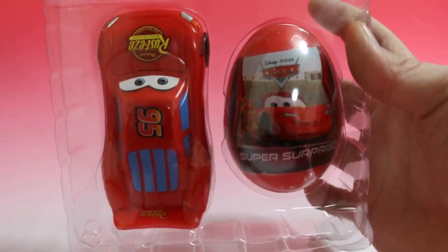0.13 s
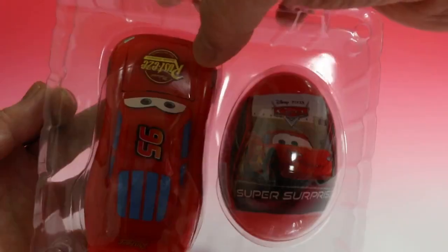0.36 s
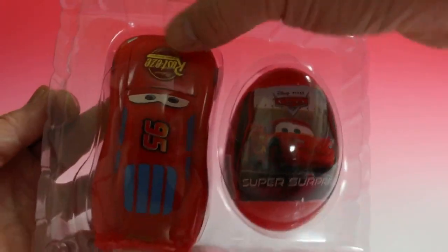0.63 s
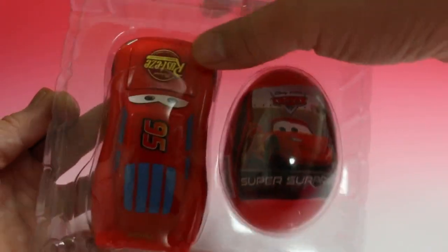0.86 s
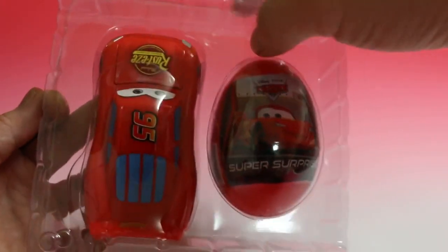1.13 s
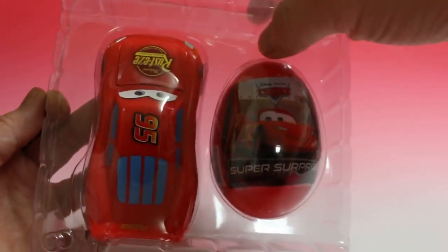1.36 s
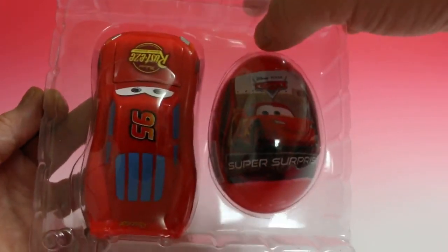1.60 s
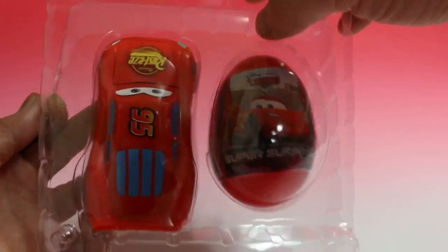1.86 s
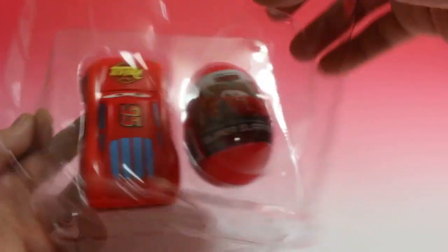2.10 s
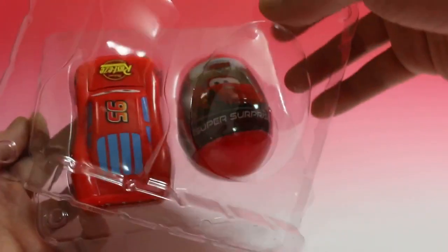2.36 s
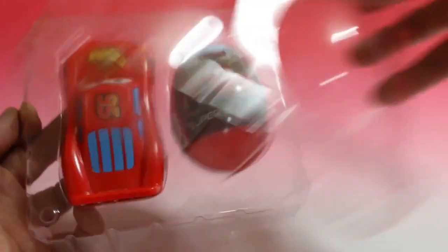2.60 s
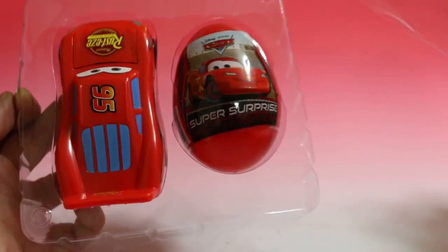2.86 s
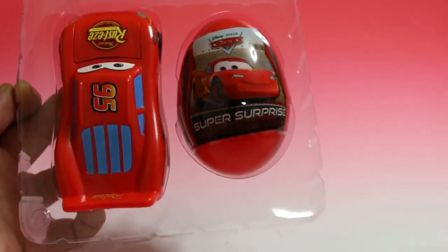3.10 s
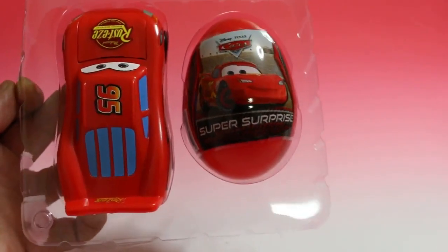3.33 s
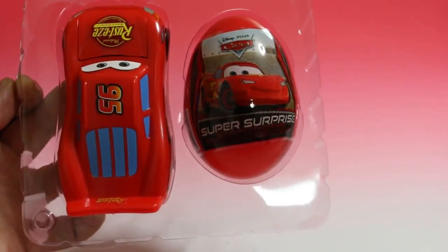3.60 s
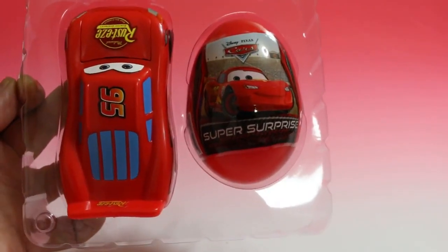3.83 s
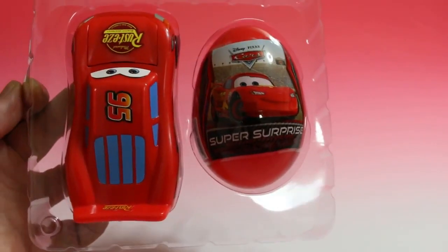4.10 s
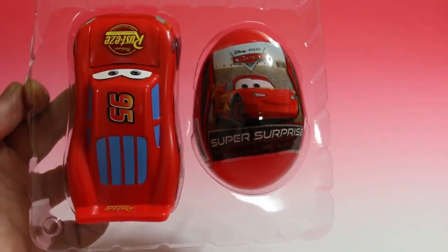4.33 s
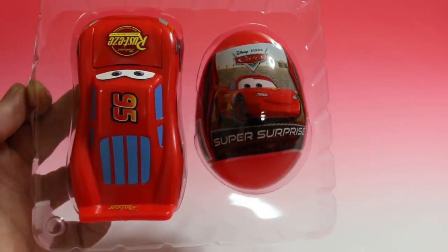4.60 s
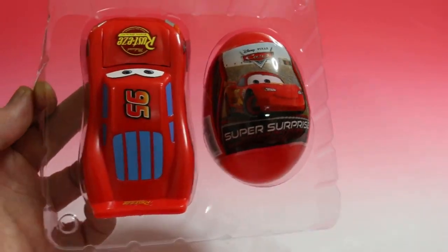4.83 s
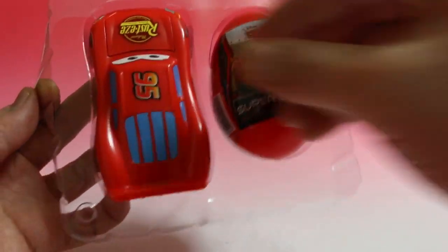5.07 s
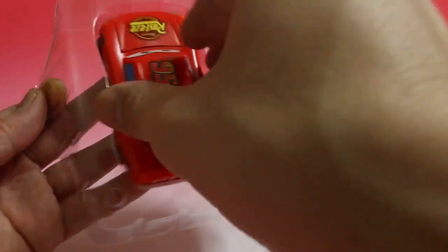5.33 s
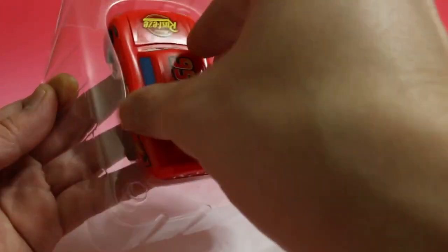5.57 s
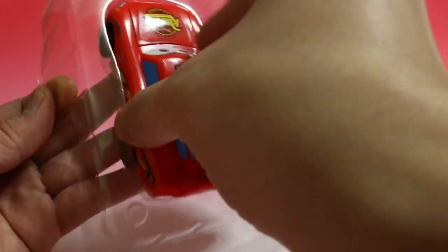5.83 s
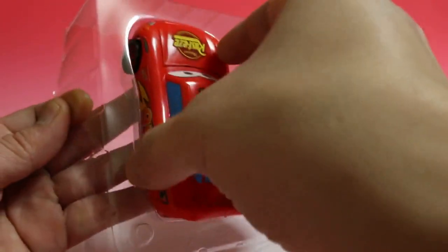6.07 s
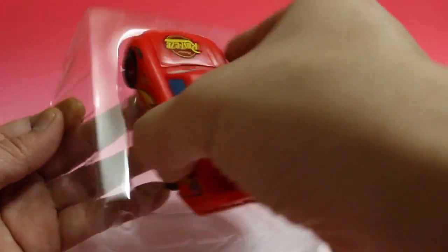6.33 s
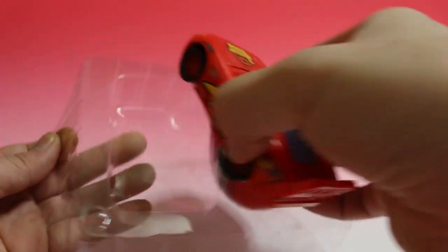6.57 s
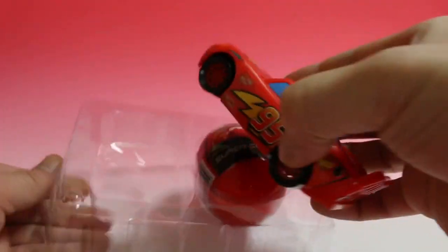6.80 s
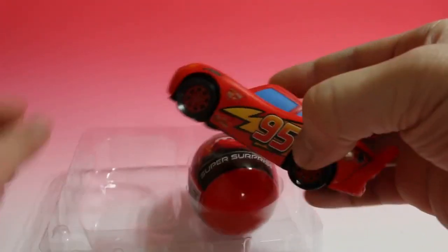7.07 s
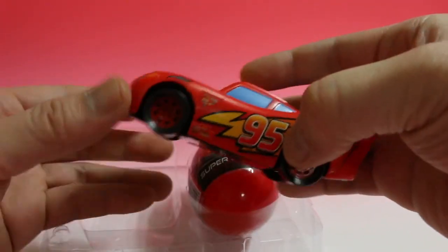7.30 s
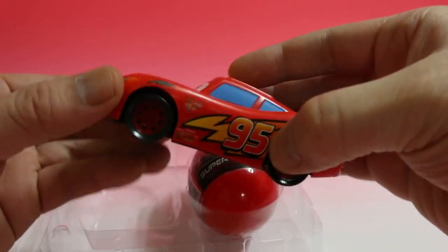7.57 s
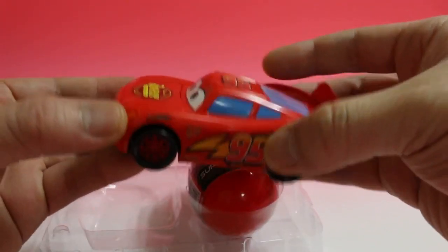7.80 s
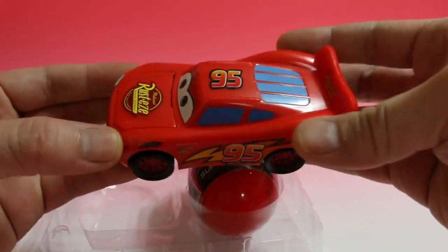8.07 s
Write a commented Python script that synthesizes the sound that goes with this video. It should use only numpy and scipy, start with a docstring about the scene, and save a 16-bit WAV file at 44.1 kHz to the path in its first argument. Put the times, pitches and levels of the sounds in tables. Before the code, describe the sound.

Close stereo pickup in a small, hard-sounding space, with low room hum and faint hiss throughout. Almost nothing until 0.4 s, when faint plastic ticks begin; from 0.7 to 1.0 s soft hollow pops and crinkles of a stiff clear tray. A quiet gap, then pops at 1.8 s and a crisp, bright snap with rustle at about 2.2 s. Tiny ticks fade by 3.2 s, leaving nearly a second of only room tone. From 4.1 to 4.8 s light dry crackling returns. After 5 s the tray flexes harder: dull pops, a strong crack at 5.5 and a very sharp one at 5.85 s. A short lull with soft bumps follows, then 6.35 to 7.2 s is densest: loud snaps, scraping rustle, boxy ringing plastic and low knocks, heaviest around 6.7 to 7.0 s. It thins to small clicks and faint crinkles until 8.2 s.

```python
"""Hands open a stiff, clear plastic blister tray close by and lift a toy out of it.
Buckling panels snap as short filtered noise bursts; rubs and bends rustle as streams of tiny noise puffs.
The bent tray hums a few notes, and knocks add dull thuds and a low shake of the table.
A small hard space answers with a short tail that rings on a few notes.
Room hum and microphone hiss, made of filtered noise, lie under it all."""
import sys
import numpy as np
from scipy import signal
from scipy.fft import rfft, irfft, next_fast_len
from scipy.io import wavfile
from scipy.ndimage import map_coordinates

SR = 44100
rng = np.random.default_rng(int(sys.argv[2]) if len(sys.argv) > 2 else 0)


def pcm_store(signal):
    """Save signal as 16-bit PCM."""
    levels = np.round(np.clip(np.atleast_2d(signal), -1, 1) * 32767)
    wavfile.write(sys.argv[1], SR, levels.astype(np.int16).T)


def voltage_ratio(level):
    """Linear amplitude factor for a level in decibels (scalar or array-like)."""
    return 10 ** (np.asarray(level, float) / 20)


N = 360738  # length in samples


# Buckling panels, peak levels before the top sheen is added:
# [start_s, crack_level_db, crack_pitch_hz, body_level_db, tick_level_db]
BUCKLES = [(.383, -52, 1500, -49, -63), (.401, -42.5, 1750, -43, -60), (0.477, -45, 1750, -44.5, -63),
           (0.6582, -47, 2350, -44, -50), (.675, -34, 2440, -44, -32.5), (0.7249, -28, 1650, -18, -57),
           (0.755, -28.5, 1630, -27, -58), (0.844, -27.5, 1550, -29, -55), (.8996, -27, 2240, -45, -51),
           (0.9867, -37, 3500, -38, -31.5), (1.142, -40, 1950, -43, -50), (1.363, -44, 1900, -50, -64),
           (1.729, -46, 2200, -48, -63), (1.7918, -34, 1600, -27, -61), (1.8279, -26, 1690, -29, -40),
           (1.9285, -45, 1520, -28.5, -62), (2.0495, -48, 1500, -57, -62), (2.172, -30, 1960, -48, -43),
           (2.184, -16, 2430, -27, -12), (2.2017, -35, 1670, -26, -32), (2.364, -31, 1900, -46, -40),
           (2.4745, -42, 2030, -50, -47), (2.594, -41, 2010, -55, -42), (2.6657, -46, 2060, -47, -33),
           (2.862, -38.5, 2880, -52, -55), (2.9818, -38.5, 2410, -57, -50), (3.02, -38, 2100, -44, -40),
           (3.1358, -37, 1940, -50, -43), (4.0641, -37.5, 1800, -42, -61), (4.1026, -30, 2900, -52, -56),
           (4.148, -42, 1520, -43, -67), (4.2538, -27.5, 2020, -44, -62), (4.3983, -23, 3300, -36, -42),
           (4.498, -27.5, 1970, -36, -43), (4.5471, -29, 1510, -37, -62), (4.642, -40, 1500, -38, -57),
           (4.6844, -26.5, 1480, -30.5, -55), (4.7386, -35, 1730, -36.5, -50),
           (5.0408, -26.5, 2100, -23, -65), (5.0665, -42, 1550, -19, -62), (5.1767, -35, 1580, -37, -50),
           (5.1907, -30.5, 1580, -30, -40.5), (5.2614, -37, 1500, -29, -42),
           (5.3941, -41.5, 2150, -40, -56), (5.419, -45, 2200, -48, -47), (5.45, -15, 2400, -18, -58),
           (5.514, -35, 2050, -23, -45), (5.539, -2.5, 2610, -12, -17), (5.6444, -32, 2950, -41, -58),
           (5.8502, 0.5, 2920, -9, -0.5), (5.8567, -7.5, 3230, -16.5, -16), (5.901, -10, 2250, -25, -17.5),
           (5.9317, -17.5, 2160, -23, -39), (5.996, -38, 2400, -24.5, -54), (6.0689, -34.5, 1950, -38, -65),
           (6.1693, -41.5, 1860, -35, -58), (6.2659, -36, 2050, -28.5, -52),
           (6.346, -14.5, 2400, -29, -14.5), (6.3706, -18.5, 2000, -42, -35),
           (6.3977, -29, 1980, -23.5, -25.5), (6.442, -24, 1890, -18, -23.5),
           (6.4496, -2.5, 1800, -20.5, -19), (6.5337, -39, 2160, -20.5, -52), (6.5425, -40, 1740, -26, -45),
           (6.6269, -11, 2160, -18, -36), (6.6767, -21, 1700, -19, -42), (6.704, -0.5, 2750, -9, -9.5),
           (6.8531, -16.5, 1810, -14.5, -26), (6.9005, -25.5, 1500, -27, -30),
           (6.9346, -18, 1760, -29, -24.5), (6.9781, 0, 1600, -7.5, -2.5), (7.0883, -19.5, 1830, -20, -39),
           (7.1294, -19, 1590, -14.5, -31), (7.2956, -33, 1730, -30, -55), (7.3497, -40, 2090, -33, -58),
           (7.4365, -28.5, 1680, -28, -60), (7.5564, -39, 1650, -37, -65), (7.5966, -42, 2880, -51, -52),
           (7.674, -16, 2640, -33, -24), (7.731, -23, 1580, -34, -50), (7.7366, -21.5, 1450, -34, -34),
           (7.85, -25, 2450, -29, -54), (7.8613, -20, 1540, -35, -60.5), (7.9048, -33, 1840, -32, -56),
           (7.9801, -24.5, 2580, -45, -57.5), (7.997, -27, 2480, -23, -50), (8.1146, -42, 1530, -42, -66)]


def snaps():
    """A buckling panel gives a very short burst: a crack around its pitch, the tray's body, a low push and a tick."""
    columns = np.transpose(BUCKLES)
    start_s, crack_db, pitch_hz, body_db, tick_db = (c[:, None] for c in columns)
    push_db = -14.5  # under the body
    t = np.arange(4096) / SR
    noise = rng.standard_normal((len(start_s), 4, len(t)))
    # the panel keeps shaking for a moment; weak buckles are more crumple than crack
    shudder = voltage_ratio(-19.5 - 0.44 * crack_db - 60 * t / 0.045) * (1 - np.exp(-t / 0.0017))
    onset = 1 - np.exp(-t / 0.00022)

    def burst(k, t60_s):
        return noise[:, k] * (voltage_ratio(-60 * t / t60_s) + shudder) * onset

    def crack_colour(f):
        return band(1150, 4700)(f) * (0.45 + resonance(f, pitch_hz, 0.3 * pitch_hz))

    crack = filtered(burst(0, 0.006), crack_colour)
    body = filtered(burst(1, 0.0033), band(745, 1177))
    push = filtered(burst(2, 0.005), band(330, 1000))
    tick = filtered(burst(3, 0.005), treble)
    hits = voltage_ratio(crack_db) * peak_one(crack) + voltage_ratio(tick_db) * peak_one(tick)
    hits += voltage_ratio(body_db) * (peak_one(body) + voltage_ratio(push_db) * peak_one(push))
    return placed(start_s[:, 0], hits)


# Rubs and bends of the sheet; brightness (hiss) and weight (flex) are relative to the peak level:
# [start_s, time_to_peak_s, peak_level_db, brightness_db, weight_db]
RUBS_AND_BENDS = [(.37, 0.049, -57.5, -22, -12), (0.639, 0.047, -47, -27, 1), (0.691, 0.032, -38, -26, -3),
                  (.75, 0.019, -48, -14, -15), (.8, .03, -49, -19, -9), (.85, .02, -45.5, -22, -12),
                  (.9, 0.017, -47, -22, -3), (0.986, 0.019, -42, -4.5, -12.5),
                  (1.028, 0.021, -41, -2.5, -14), (1.13, 0.025, -52, -8, -5.5),
                  (1.34, 0.023, -59.5, -18, -1), (1.71, .02, -68, -15, -0.5),
                  (1.786, 0.013, -37.5, -20, -19), (1.931, 0.0049, -38, -40, -14),
                  (2.02, 0.057, -50, -14, -0.5), (2.15, 0.053, -39.5, -8.5, -17),
                  (2.181, 0.011, -37.5, 4.5, 6), (2.218, .03, -41.5, -6.5, -5), (2.35, 0.027, -52, -9, -4),
                  (2.45, 0.16, -63, -1, -7), (2.65, 0.011, -67, -27, 5), (2.85, 0.027, -71, 6, 6),
                  (2.975, 0.018, -52, -5.5, -4), (3.015, 0.023, -51.5, -3.5, 0.5),
                  (3.125, .025, -54, -11, -8), (3.195, 0.015, -55, -0.5, -9),
                  (4.055, 0.033, -52.5, -12, -11), (4.223, .035, -48.5, -14, -24),
                  (4.399, 0.0087, -48.5, -17, -12), (4.491, 0.054, -49, -13, -14.5),
                  (4.64, 0.045, -46.5, -11, 6), (4.97, 0.052, -62, -7, 3), (5.041, 0.014, -33, -50, -13),
                  (5.17, 0.022, -41.5, -24, 0), (5.245, .022, -41, -23, -22),
                  (5.39, 0.034, -48.5, -10, -4.5), (5.45, 0.01, -30, -43, -19),
                  (5.538, 0.011, -42, -3, -21), (5.57, 0.026, -42, -12.5, -16),
                  (5.71, 0.02, -46, -10.5, -17), (5.853, 0.0099, -34.5, -5, -27),
                  (5.899, 0.02, -33, -4.5, -22), (5.96, 0.05, -47, -13, -3.5),
                  (6.155, 0.022, -45, -14.5, -4), (6.205, 0.018, -55, -17, 9), (6.252, 0.025, -42, -24, -5),
                  (6.345, 0.02, -34.5, -5, -3), (6.39, 0.016, -39.5, -3, -1), (6.44, 0.025, -39, 1, -26),
                  (6.49, 0.043, -38, -9.5, -27), (6.55, 0.051, -37.5, -5, -25),
                  (6.627, 0.0097, -27, -15, -5), (6.65, 0.041, -34.5, -16, -24),
                  (6.705, 0.0051, -26, -16, -27), (6.73, .025, -34.5, -15.5, -26),
                  (6.785, 0.029, -33.5, -20.5, -18), (6.851, .018, -24.5, -20.5, -2),
                  (6.919, 0.021, -32, -9.5, -8), (6.979, 0.0053, -21, -25, -20),
                  (7.02, 0.055, -34.5, -5.5, -10), (7.09, 0.032, -34, -28, 0.5),
                  (7.165, .025, -36.5, -22, -2.5), (7.293, 0.028, -44, -25, -10.5),
                  (7.436, 0.018, -40, -20.5, -11), (7.53, 0.036, -47, -32, -8),
                  (7.673, 0.02, -50.5, -8, -17), (7.725, 0.049, -49.5, -13, -12),
                  (7.9, 0.013, -55, -26, -16), (7.844, 0.024, -46.5, -14, -25),
                  (7.978, 0.012, -37, -16, -42), (8.09, 0.037, -52, -18, -25)]


def rustle():
    """One stream of slips shakes body, crackle, hiss and the tray's notes; flex is a slower, softer stream."""
    start_s, rise_s, level_db, bright_db, weight_db = np.transpose(RUBS_AND_BENDS)
    slips = grains(1200, spread_db=5.0, life_s=0.0018)
    slow_slips = grains(150, spread_db=6.5, life_s=0.0046)
    force = swells(start_s, rise_s, level_db)
    body = force * unit(filtered(slips, band(554, 1467)))
    # crackle takes about half of the brightness
    crackle_force = swells(start_s, rise_s, level_db + 1 + 0.51 * bright_db)
    crackle = crackle_force * unit(filtered(slips, band(1530, 3060)))
    hiss = swells(start_s, rise_s, level_db + bright_db) * unit(filtered(slips, treble))
    flex = swells(start_s, rise_s, level_db + weight_db) * unit(filtered(slow_slips, band(180, 495)))
    return body + crackle + hiss + tray_hum(slips, force) + flex


# Notes that the bent tray hums: [pitch_hz, width_hz]
TRAY_NOTES = [(573, 38), (676, 18), (1000, 29)]
# Moments when one note hums out: [start_s, time_to_peak_s, peak_level_db, pitch_hz]
NOTE_SWELLS = [(.705, 0.015, -31.5, 573), (.755, 0.0085, -36, 573), (.99, 0.023, -33, 1000),
               (1.786, 0.0041, -31, 573), (1.929, 0.0055, -37.5, 573), (1.0, .03, -49, 573),
               (2.365, 0.024, -51, 573), (2.19, 0.012, -36.5, 573), (2.225, 0.0099, -27, 1000),
               (2.85, 0.017, -52, 676), (2.98, .012, -46, 573), (3.02, 0.019, -44.5, 573),
               (3.12, 0.027, -44, 676), (3.2, .018, -51, 676), (4.4, 0.01, -53, 676),
               (4.65, 0.019, -54, 1000), (5.05, 0.017, -28.5, 1000), (5.24, 0.061, -51, 1000),
               (5.451, 0.011, -39.5, 1000), (5.46, 0.026, -55, 573), (5.515, 0.021, -28, 676),
               (5.539, 0.0083, -31, 1000), (5.851, 0.071, -40, 1000), (6.15, 0.018, -46, 1000),
               (6.45, .018, -29.5, 1000), (6.56, 0.055, -32, 1000), (6.63, .015, -31.5, 1000),
               (6.65, 0.024, -33.5, 573), (6.704, 0.037, -27.5, 1000), (6.705, 0.011, -33, 676),
               (6.77, 0.018, -47, 1000), (6.775, 0.047, -45, 676), (6.855, 0.028, -29.5, 573),
               (6.856, 0.023, -20.5, 676), (6.925, 0.013, -32, 676), (6.93, 0.024, -27, 1000),
               (7.0, 0.025, -39.5, 1000), (7.11, .035, -37.5, 1000), (7.345, 0.013, -40, 1000),
               (7.09, 0.025, -29.5, 573), (7.095, 0.047, -32, 676), (7.295, 0.011, -50, 1000),
               (7.437, 0.0091, -27, 1000), (7.54, 0.02, -49, 676), (7.545, 0.014, -54, 573),
               (7.855, .02, -46, 1000), (7.99, .015, -48, 1000)]


def tray_hum(slips, force):
    """Slips ring the bent tray's narrow resonances; a random flutter in level breaks the notes up."""
    flutter_db, flutter_per_s = 5.5, 40
    wake_db = -11  # every stroke wakes all the notes a little
    events = np.array(NOTE_SWELLS)
    nearest = np.abs(events[:, 3:] - np.array(TRAY_NOTES)[:, 0]).argmin(1)
    hum = np.zeros(N)
    for k, (hz, width_hz) in enumerate(TRAY_NOTES):
        ringing = filtered(slips, lambda f: resonance(f, hz, width_hz) ** 2)
        note = unit(voltage_ratio(flutter_db * wobble(flutter_per_s)) * ringing)
        own_swells = swells(*events[nearest == k, :3].T)
        hum += np.hypot(own_swells, voltage_ratio(wake_db) * force) * note
    return hum


def grains(per_second, spread_db, life_s):
    """Tiny slips at random moments with a few big ones, each a short noise puff."""
    happens = rng.random(N) < per_second / SR
    size = happens * voltage_ratio(spread_db * np.minimum(rng.exponential(size=N), 3.2))
    puff = np.exp(-np.arange(400) / SR / life_s)
    return signal.fftconvolve(size, puff)[:N] * rng.standard_normal(N)


# Colour of the plastic's treble, as gain against frequency: [frequency_hz, gain_db]
PLASTIC_TREBLE = [(2650, -32), (4500, -4), (5080, -4), (5590, -4), (10600, -7.5), (14900, -16.5),
                  (16000, -18)]


def treble(f):
    """The sheet's colour above its panel notes."""
    return band(3900, 30000)(f) * voltage_ratio(along(PLASTIC_TREBLE, np.maximum(f, 4500)))


# Extra sheen around 14 kHz, strongest in the first 2.4 s: [time_s, level_db]
TOP_SHEEN = [(0, 0.5), (2.4, -1.5), (2.6, -22), (6.3, -43), (6.6, -10), (8.18, -19)]


def with_sheen(x):
    """A broad resonance around 14 kHz is added to the sound, stronger or weaker over time."""
    sheen = filtered(x, lambda f: resonance(f, 14100, 6200))
    return x + voltage_ratio(curves(TOP_SHEEN)[0]) * sheen


# The tray knocks against hand or table: [knock_s, thud_peak_db, table_shake_db]
TRAY_KNOCKS = [(0.399, -41, -62), (0.674, -40, -62), (0.724, -15.5, -54), (0.753, -27, -66),
               (0.843, -29, -57), (1.787, -22.5, -68), (1.928, -26.5, -50), (2.049, -34.5, -49.5),
               (2.2, -18.5, -40), (2.366, -37.5, -54.5), (4.683, -36, -46.5), (4.738, -52, -52),
               (5.066, -25, -54), (5.19, -24, -42.5), (5.26, -26.5, -66), (5.449, -22.5, -71),
               (5.538, -8.5, -67), (5.643, -29, -52), (5.847, -14, -49), (5.93, -20, -70),
               (5.995, -24, -56), (6.169, -33, -53), (6.266, -30, -45.5), (6.449, -16, -50.5),
               (6.534, -23, -50), (6.626, -17, -41.5), (6.701, -21, -59), (6.853, -4, -30),
               (6.935, -29, -36), (7.129, -23, -34.5), (7.189, -26, -40.5), (7.434, -38, -50)]


def knocks():
    """A soft knock of the whole tray: a dull burst in its low panels."""
    knock_s, thud_db, _ = np.transpose(TRAY_KNOCKS)
    lag_s = 0.00185  # every thud starts this long after its listed time
    t = np.arange(4096) / SR
    after_shake = voltage_ratio(-19.5 - 60 * t / 0.071) * (1 - np.exp(-t / 0.0055))
    envelope = voltage_ratio(-60 * t / 0.0052) + after_shake
    burst = rng.standard_normal((len(knock_s), len(t))) * envelope
    thuds = peak_one(filtered(burst, band(257, 750)))
    return placed(knock_s + lag_s, voltage_ratio(thud_db[:, None]) * thuds)


def table():
    """The table swings up in low filtered noise after each knock, over a faint steady low rumble."""
    knock_s, _, shake_db = np.transpose(TRAY_KNOCKS)
    rise_s, rumble_db = 0.017, -67.5
    shake = np.hypot(swells(knock_s, rise_s, shake_db), voltage_ratio(rumble_db))
    return shake * unit(filtered(rng.standard_normal(N), band(102.7, 186.5)))


# Notes on which the space rings: [pitch_hz, width_hz, level_db]
SPACE_NOTES = [(385, 56, -36.5), (579, 54, 3.5), (670, 5, -15), (871, 18, 8.5), (971, 6.9, 6.5),
               (1090, 56, -36), (1290, 24, -36), (1740, 440, -4), (2900, 1100, -7.5)]
# Time in which the tail falls by 60 dB: [frequency_hz, fall_s]
TAIL_FALL = [(150, 0.62), (600, 0.15), (2000, 0.35), (6000, 0.33), (14000, 0.2)]
# How alike the tail is left and right (1 = the same): [frequency_hz, likeness]
TAIL_LIKENESS = [(150, 1), (400, 0.97), (950, 0.9), (2400, 0.29), (6000, 0.011), (15000, 0.033)]


def space(x, hop=4096):
    """Decaying noise makes a ringing tail, drawn anew for each block of about a tenth of a second."""
    blocks = np.pad(x, (0, -N % hop)).reshape(-1, hop)
    noise = rng.standard_normal((2, len(blocks), SR // 2))
    hz, t, z = signal.stft(noise, SR, nperseg=256)
    onset = 1 - np.exp(-t / 0.00067)
    decay = voltage_ratio(-60 * t / along(TAIL_FALL, hz)[:, None])
    tail = signal.istft(z * onset * decay, SR, nperseg=256)[1][..., :SR // 2]
    tail = pair(tail / np.sqrt(np.sum(tail ** 2, -1, keepdims=True)), TAIL_LIKENESS)
    tail = filtered(tail, lambda f: 1 + sum(voltage_ratio(db) * resonance(f, c, w) for c, w, db in SPACE_NOTES))
    tail *= voltage_ratio(-5.0)
    wet = signal.fftconvolve(blocks[None], tail, axes=-1)
    out = np.zeros((2, N + hop + wet.shape[-1]))
    for k in range(len(blocks)):
        out[:, k * hop:][:, :wet.shape[-1]] += wet[:, k]
    return out[:, :N]


# Where the hands are: [time_s, left_later_by_microseconds, left_minus_right_db]
HAND_PLACES = [(0, 44, 0), (2.4, 37, -0.5), (3, 81, -2), (4.2, 120, -4.5), (4.9, 72, -1.5), (5.1, -22, -1),
               (7.2, -28, -1), (7.6, 43, -1), (8.18, 38, -1)]


def ports(x):
    """The sound reaches the two microphone ports at slightly different times and levels as the hands move."""
    late_us, pan_db = curves(HAND_PLACES)
    late = late_us * 1e-6 * SR / 2  # in samples, half for each side
    sides = []
    for channel, way in zip(x, (1, -1)):
        moved = map_coordinates(channel, [np.arange(N) - way * late])
        sides.append(voltage_ratio(way * pan_db / 2) * moved)
    return np.array(sides)


# Colour of hum and hiss, only the shape counts: [frequency_hz, relative_level_db]
FLOOR_COLOUR = [(15, -50), (25, -7.5), (64, -9.5), (102, 3), (127, -8), (180, -5.5), (326, -9.5), (373, -9),
                (405, -18), (489, -9.5), (887, -13), (1290, -15.5), (1560, -16), (6740, -21.5),
                (16000, -30)]
# How alike the floor is left and right (1 = the same): [frequency_hz, likeness]
FLOOR_LIKENESS = [(60, 1), (180, 0.75), (550, 0.28), (1650, 0.19), (4970, -0.15), (15000, 0.18)]


def floor():
    """Filtered noise: room hum near mono under nearly unrelated hiss."""
    noise = filtered(rng.standard_normal((2, N)), lambda f: voltage_ratio(along(FLOOR_COLOUR, f)))
    return voltage_ratio(-55.5) * unit(pair(noise, FLOOR_LIKENESS))


def swells(starts, rises, peaks_db):
    """Each event swells to its peak in its rise time and fades over a few more; overlaps add in power."""
    steep = 1.574  # how sharply an event swells and fades
    power = np.zeros(N)
    for start_s, rise_s, db in np.broadcast(starts, rises, peaks_db):
        part = power[round(start_s * SR):][:round(rise_s * SR) * 12]
        u = np.arange(len(part)) / SR / rise_s
        part += (voltage_ratio(db) * (u * np.exp(1 - u)) ** steep) ** 2
    return np.sqrt(power)


def placed(starts, hits):
    """Short sounds laid out at their times in seconds."""
    out = np.zeros(N + hits.shape[1])
    for start, hit in zip(starts, hits):
        out[round(start * SR):][:len(hit)] += hit
    return out[:N]


def wobble(rate):
    """A smooth random curve with rate knots a second."""
    return map_coordinates(rng.standard_normal(N // 400), [np.arange(N) * rate / SR])


def pair(noise, alike):
    """Two unrelated noises (first axis) become left and right, alike by frequency."""
    def turn(f):
        return np.arccos(np.clip(along(alike, f), -1, 1)) / 2

    mid = filtered(noise[0], lambda f: np.cos(turn(f)))
    side = filtered(noise[1], lambda f: np.sin(turn(f)))
    return np.array([mid + side, mid - side])


def filtered(x, response):
    """x times a response over frequency, along the last axis."""
    n = x.shape[-1]
    m = next_fast_len(n + 4096)
    return irfft(rfft(x, m) * response(np.fft.rfftfreq(m, 1 / SR)), m)[..., :n]


def resonance(f, hz, width_hz):
    """A causal resonance of gain 1 at its centre."""
    return 1j * f * width_hz / (hz * hz - f * f + 1j * f * width_hz)


def band(lo_hz, hi_hz):
    """A causal band with steep skirts."""
    zeros, poles, gain = signal.butter(3, [lo_hz, hi_hz], "bandpass", analog=True, output="zpk")
    return lambda f: signal.freqs_zpk(zeros, poles, gain, f)[1]


def along(points, hz):
    """Reads (frequency, value) points on a log frequency axis."""
    f, v = np.transpose(points)
    return np.interp(np.log(hz + 1), np.log(f + 1), v)


def curves(rows):
    """One value per sample for each column after the time."""
    s, *cols = np.transpose(rows)
    return [np.interp(np.arange(N) / SR, s, c) for c in cols]


def unit(x):
    """Scaled to rms 1."""
    return x / np.sqrt(np.mean(x ** 2) + 1e-20)


def peak_one(x):
    """Each row scaled to peak 1."""
    return x / np.abs(x).max(-1, keepdims=True)


def scene():
    """Tray and table, direct and through the space, over the floor."""
    sharp = with_sheen(snaps()) + knocks()
    soft = with_sheen(rustle()) + table()
    # snaps and knocks feed the tail 4 dB weaker than the rustle
    tail = space(voltage_ratio(-4) * sharp + soft)
    return ports(sharp + soft + tail) + floor()


def band_limit(x):
    """A steep low-pass at the top of the band."""
    return signal.sosfilt(signal.butter(12, 21850, fs=SR, output="sos"), x)


def record(dry):
    """Peaks beyond full scale clip; then nothing above the band limit is kept."""
    top_hz = 16100
    clipped = np.clip(dry, -1, 1)
    mix = filtered(clipped, lambda f: f < top_hz)
    return band_limit(mix)


dry = scene()
out = record(dry)
pcm_store(out)
```